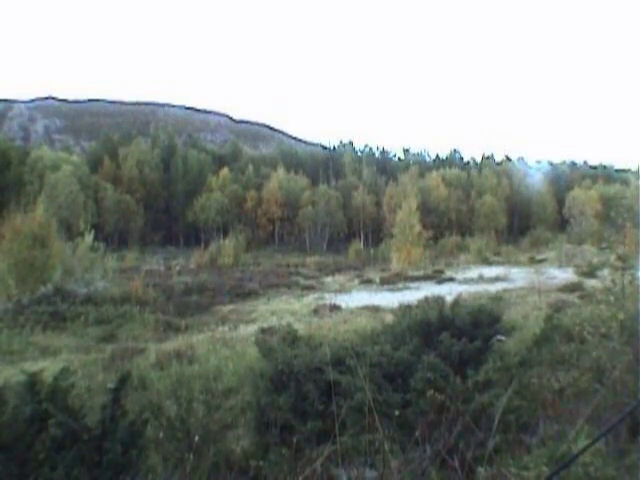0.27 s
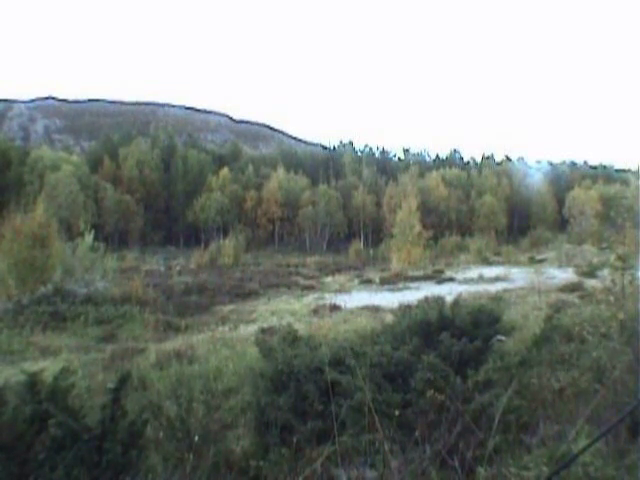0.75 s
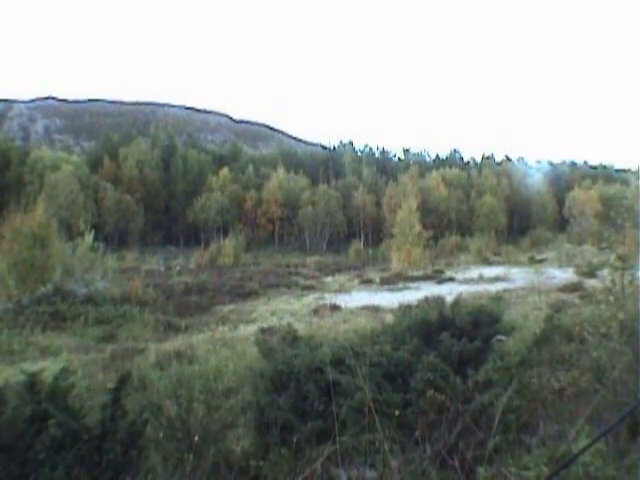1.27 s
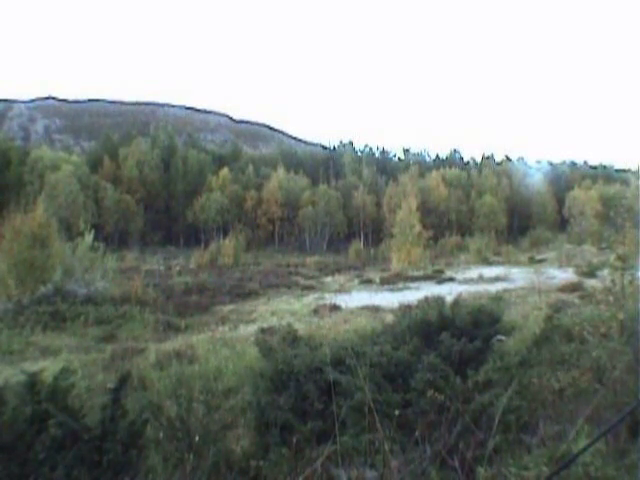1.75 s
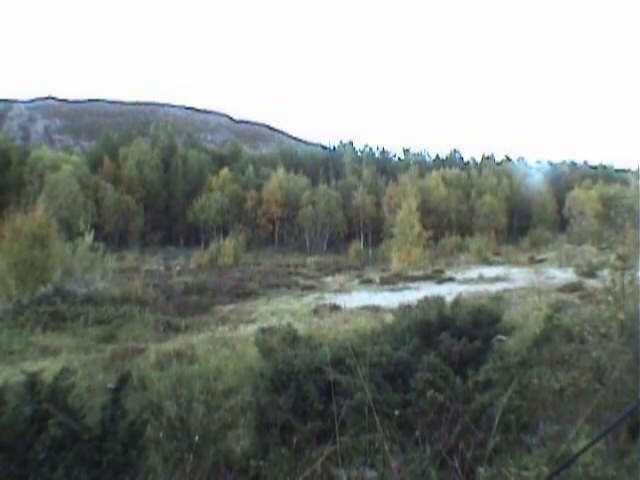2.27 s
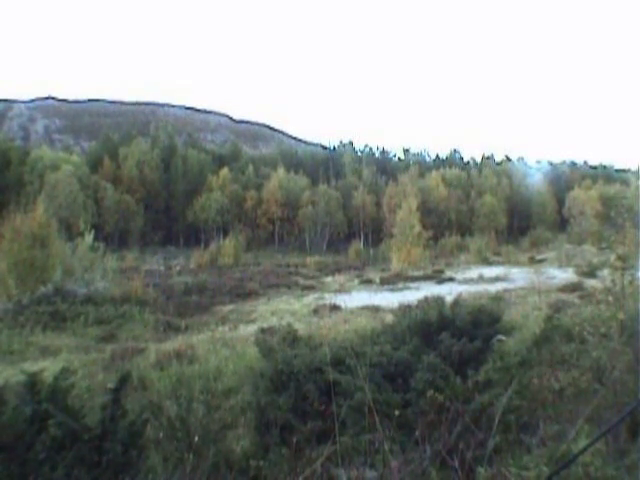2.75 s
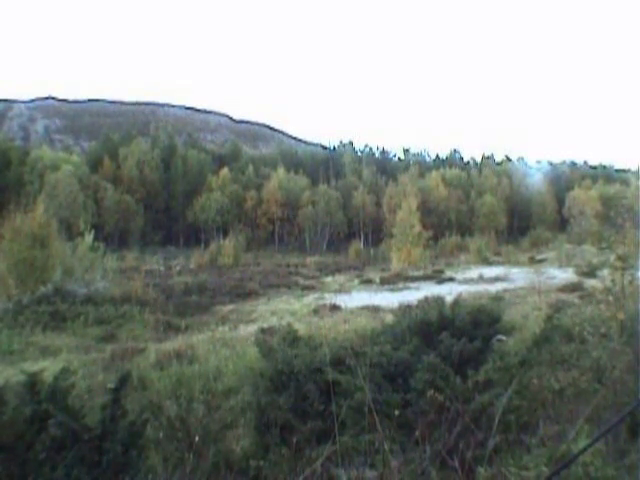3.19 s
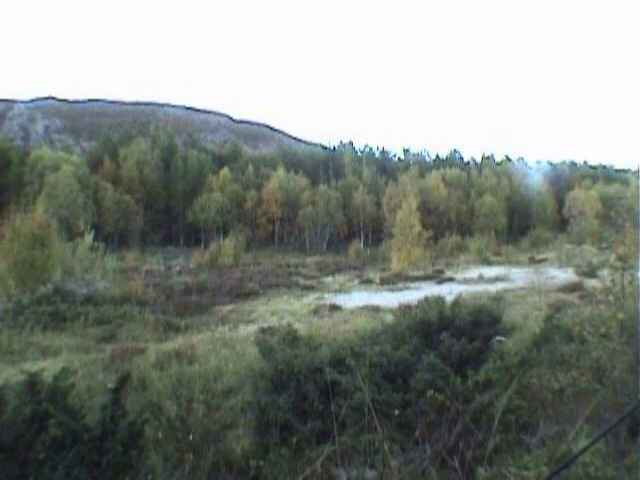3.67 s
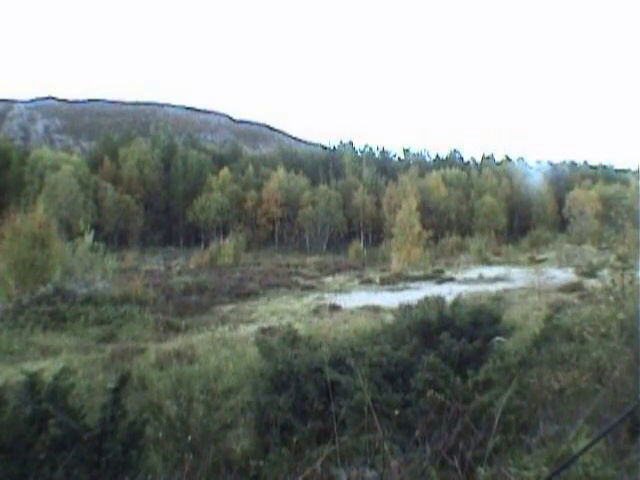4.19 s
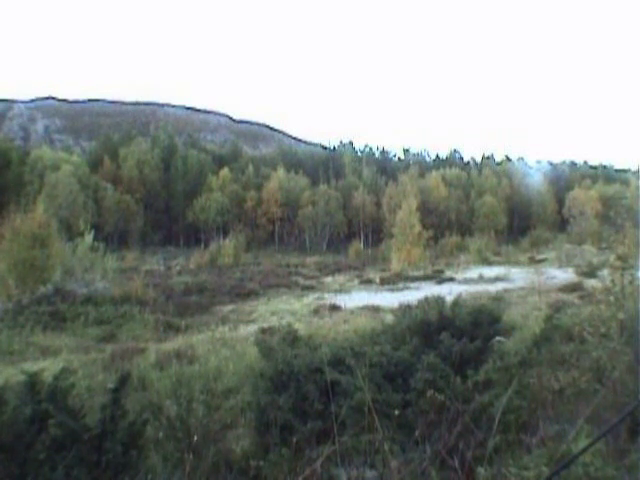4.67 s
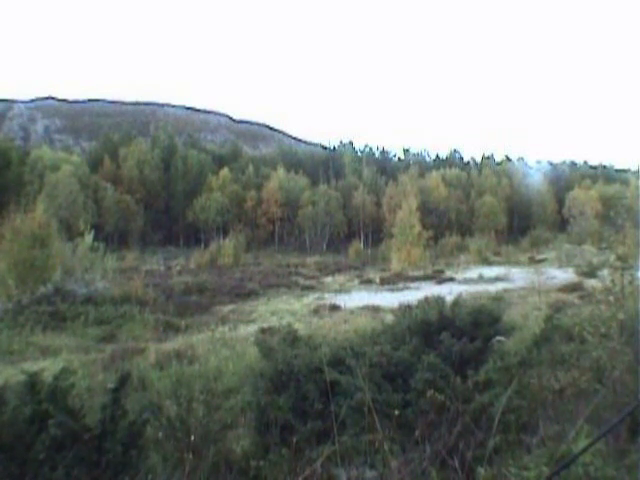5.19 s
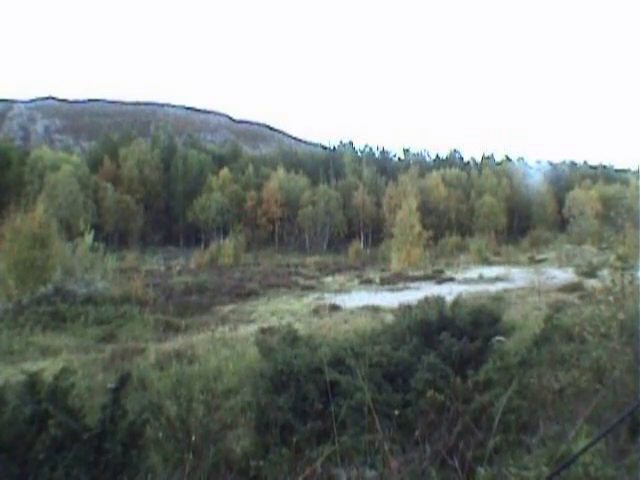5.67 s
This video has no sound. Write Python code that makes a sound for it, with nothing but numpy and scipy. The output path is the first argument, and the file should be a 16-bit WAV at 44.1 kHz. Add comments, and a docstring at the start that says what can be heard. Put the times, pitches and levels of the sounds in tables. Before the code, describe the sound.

A faint outdoor rush and a thin motor hum from the camera open the scene. A hunting dog yelps three times in quick succession, its clear, high voice ringing through the woodland. After the echo fades, two stronger, hoarser yelps follow, crackling slightly in the microphone. A soft handling bump and rustle come as the last echo dies away.

```python
"""A hound gives five high, yelping bays, three and then two, at the edge of an autumn wood.
Its vocal folds buzz through its throat: each bay arches up in pitch, rings clear and ends in a rasp.
The trees throw back a long tail. Under it lie a far rush of air and the hum of a camera's motor.
Loud notes crackle faintly, and near the end a hand nudges the camera."""
import sys
import numpy as np
from scipy import signal
from scipy.fft import rfft, irfft, next_fast_len
from scipy.io import wavfile
from scipy.ndimage import uniform_filter1d

SR = 44100
rng = np.random.default_rng(int(sys.argv[2]) if len(sys.argv) > 2 else 0)


def log_audio(samples):
    """Write samples as a 16-bit WAV file to the path given in sys.argv[1]."""
    # one column per channel
    frames = np.atleast_2d(samples).T
    # limit to full scale, then quantise
    limited = np.clip(frames, -1, 1)
    pcm = np.round(limited * 32767).astype(np.int16)
    wavfile.write(sys.argv[1], SR, pcm)


N = 261513
TIME = np.arange(N) / SR
# in the third bay the voice catches on a lower, fuller note, then breaks upward
CATCH_BAY, CATCH_HZ, BREAK_S, BREAK_HZ_PER_S = 2, 690.5, 2.425, 12000


def hound(ear_lag_s=.00002, hiss_db=-55.5, linger_db=-25):
    """All five bays: the stereo sound that comes straight to us, and the sound sent into the trees."""
    # one bay a row: (start [s], length [s], opening pitch [Hz], top pitch [Hz], sag of the top [Hz/s],
    # overshoot [Hz], fade-in [s], level at the swell [dB], swell after [s], swell size [dB],
    # base note's share at the swell [dB], mouth brightness [dB], extra brightness at first [dB],
    # treble from strain [dB], hoarseness [rad per harmonic], rasp [dB], left over right [dB],
    # level sent into the trees [dB])
    bays = [(1.608, 0.147, 770, 889, 149, 51.5, 0.016, -15.5, 0.083, 9.5, -11.5, 0.2, -16, -4.5, 0.04, -2.5, -2.5, -0.5),
            (2.032, 0.131, 679, 791.5, 785, 2, 0.0092, -18, 0.047, 5.5, -11, -4.5, -8.5, -6, 0.045, -7, -2.5, 0),
            (2.367, 0.142, 542.5, 811.2, -100, -1, .02, -20.7, 0.088, 3, -10, -1.5, 12, -2.0, 0.1, -4.5, -2.5, -0.9),
            (4.272, 0.149, 682.3, 893.6, -5, -1.5, 0.012, -13, 0.076, 13.5, -14.5, -3.1, 17.5, 4, 0.081, 0, -2.5, 0.9),
            (4.629, 0.135, 622.3, 863.8, -310, 2, 0.012, -17.5, 0.064, 11, -12, -5.5, 13.5, 7.5, 0.075, 0, -3.5, 3.5)]
    # rasp of swirling air in the throat: (frequency [Hz], relative level [dB])
    rasp_colour = [(250, -28.5), (450, -32.5), (650, -9.5), (1000, -22), (1500, 8.5), (2000, 6.5),
                   (2550, 10), (3000, -16.5), (3800, -9), (4800, -10.5), (6800, -21), (8000, -25)]
    jitter, shimmer = 0.063 * drift(300), 0.46 * drift(170)   # unsteadiness of pitch and of strength
    rasp = noise(lambda hz: from_db(at_hz(rasp_colour, hz)))
    hiss = band(centre_hz=3820, width_hz=990) + 0.29 * band(centre_hz=6500, width_hz=2200)
    # the caught note lingers under the high one and beats with it
    linger = np.sqrt(2) * from_db(linger_db) * bell(BREAK_S + 0.017, half_s=0.03)
    low_note = linger * np.sin(2 * np.pi * CATCH_HZ * TIME)
    straight, sent = 0, 0
    for k, (*row, pan_db, sent_db) in enumerate(bays):
        catches, end_s = k == CATCH_BAY, row[0] + row[1]
        voice = bay(row, catches, jitter, shimmer, rasp)
        # as the folds let go, the last air hisses past the dog's teeth
        voice = voice + from_db(hiss_db) * hiss * bell(end_s + 0.0095, half_s=0.0085)
        straight = straight + place(voice + catches * low_note, pan_db, ear_lag_s)
        sent = sent + voice * from_db(sent_db)
    return straight, sent


def bay(row, catches, jitter, shimmer, rasp, release_s=0.036, slack_db_per_hz=0.12):
    """One bay: the vocal folds chop the breath into a base note and its overtones (whole multiples)."""
    (start_s, length_s, opening_hz, top_hz, sag, overshoot_hz, attack_s, peak_db, peak_s, swell_db,
     peak_share_db, open_db, opening_db, strain_db, hoarse, rasp_db) = row
    end_s = start_s + length_s
    on = (TIME > start_s) & (TIME < end_s)
    t = TIME[on]
    since, left = t - start_s, end_s - t
    pitch = pitch_arch(since, length_s, opening_hz, top_hz, sag, overshoot_hz)
    swell = bell(start_s + peak_s, half_s=0.028)[on]
    push_db = swell_db * (swell - 1)
    # on the way down the base note passes the throat's lowest resonance and grows
    closing = bell(end_s - .02, half_s=0.0068)[on]
    flutter_db = 0.9 * (1 - swell) * wander(63, size=len(t), count=1)[0]
    level_db = peak_db + push_db + 2 * closing + flutter_db
    # the swell goes mostly into the overtones, so the base note's share shrinks
    share_db = peak_share_db - 0.65 * push_db + 4 * closing
    if catches:
        pitch = np.minimum(pitch, CATCH_HZ + BREAK_HZ_PER_S * np.maximum(t - BREAK_S, 0))
        caught = bell(BREAK_S - 0.0055, half_s=0.011)[on]
        level_db, share_db = level_db + 4.5 * caught, share_db + 8.5 * caught
    # the folds swing unevenly as they start and as they let go; the middle is clear
    rough = np.clip(.055 + 0.23 * np.exp(-since / .018) + 0.79 * np.exp(-(left / 0.021) ** 2), 0, 1)
    phase = 2 * np.pi * np.cumsum(pitch * (1 + rough * jitter[on])) / SR
    # each closing of the folds comes a little early or late
    fray = hoarse * drift(450)[on]
    bright_db = open_db + opening_db * np.exp(-(since / .024) ** 2)
    # strain and the swell lift the treble, more so late in the bay; slack folds dull it
    treble_db = strain_db + 0.22 * (push_db - np.median(push_db)) + 1.5 * (2 * since / length_s - 1)
    treble_db -= slack_db_per_hz * (top_hz - pitch)
    overtones = throat(pitch, phase, fray, bright_db, treble_db)
    share = from_db(np.minimum(share_db, -1.2))
    folds = share * np.sin(phase) + np.sqrt(1 - share ** 2) * overtones
    # air rushes through each time the folds open
    breath = from_db(rasp_db) * rough * rasp[on] * (1 + 0.45 * np.cos(phase))
    voice = folds * np.sqrt(2 - rough ** 2) * (1 + rough * shimmer[on]) + breath
    out = np.zeros(N)
    out[on] = voice * from_db(level_db) * np.minimum(since / attack_s, 1) * np.minimum(left / release_s, 1)
    return out


def pitch_arch(since, length_s, opening_hz, top_hz, sag, overshoot_hz,
               climb_hz_per_s=6330, drop_hz_per_s=9840, end_hz=449, rounding_hz=44.6):
    """A bay's pitch climbs, holds and drops: the lowest of three curves, with rounded corners."""
    climb = opening_hz + climb_hz_per_s * since
    overshoot = overshoot_hz * np.exp(-.5 * ((since - .032) / .011) ** 2)   # from a hard start
    top = top_hz - sag * (since - length_s / 2) + overshoot
    drop = end_hz + drop_hz_per_s * (length_s - since)
    return -rounding_hz * np.log(np.sum(np.exp(-np.array([climb, top, drop]) / rounding_hz), axis=0))


def throat(pitch, phase, fray, bright_db, treble_db,
           length_ratio=0.96, mouth_hz=2300, mouth_width_hz=650, strain_hz=3300):
    """Overtones glide through the throat's resonances, the pitches at which it rings most easily."""
    # throat and open mouth at a length ratio of 1: (frequency [Hz], relative level [dB])
    resonances = [(1000, 4.5), (1400, -5.5), (1780, 4), (2100, -12), (2420, -3), (2700, -20.5),
                  (3100, -33.5), (3550, -23.5), (4000, -36), (4330, -51), (4680, -41.5), (5250, -39),
                  (5600, -30.5), (6300, -36), (7200, -36.5), (8000, -72)]
    k = np.arange(2, 13)[:, None]
    hz = k * pitch
    # above the second harmonic, the mouth's opening shapes the level and each one flickers on its own
    mouth_db = bright_db * np.exp(-.5 * ((hz - mouth_hz) / mouth_width_hz) ** 2)
    flicker_db = 2.8 * wander(70, size=len(pitch), count=len(k))
    lift_db = treble_db * np.clip(hz / strain_hz, 0, 1) ** 4
    gains = from_db(at_hz(resonances, hz * length_ratio) + (k > 2) * (mouth_db + flicker_db) + lift_db)
    gains /= np.sqrt(np.sum(gains ** 2, axis=0))
    # uneven timing frays the highest overtones most
    return np.sum(gains * np.sin(k * phase + (k - 2) * fray), axis=0)


def woodland(x, build_s=0.011, likeness=0.7, pan_db=0.9, near_db=8.5, near_s=0.056, flutter_db=1.5):
    """Countless trunks scatter a tail that dies sooner in the treble; a few near ones echo singly."""
    # scatter from the trees: (frequency [Hz], level [dB], time to fade by 60 dB [s])
    trees = [(300, -9, 4.3), (630, -7.5, 1.96), (890, -10.5, 1.9), (1700, -13, 1.365), (2520, -18.5, 1.5),
             (3420, -19.5, .25), (7000, -13, 0.2)]
    # nearest trunks and ground: (delay [s], level [dB])
    echoes = [(.0125, -28), (.031, -23.5), (0.097, -28), (.135, -26), (.21, -37.5)]
    t = TIME[:2 * SR]
    edges_hz = np.geomspace(250, 8000, 11)
    white = rng.standard_normal((2, 2, len(t)))
    response = np.zeros((2, len(t)))   # how the wood answers a single click
    for k, (low, high) in enumerate(zip(edges_hz, edges_hz[1:])):
        mid, side = signal.sosfilt(butter(2, [low, high], "band"), white[k % 2])
        hz = np.sqrt(low * high)
        decay = from_db(-60 * t / at_hz(trees, hz, axis=2))
        decay *= (1 - np.exp(-t / build_s)) * from_db(near_db * np.exp(-t / near_s))
        decay *= from_db(at_hz(trees, hz)) / np.sqrt(2 * np.sum(decay ** 2))
        response += decay * (np.sqrt(1 + likeness) * mid + np.sqrt(1 - likeness) * side * [[1], [-1]])
    tail = signal.fftconvolve(x[None], response, axes=1)[:, :N]
    tail = tail * from_db([[pan_db / 2], [-pan_db / 2]]) * from_db(flutter_db * drift(35))
    dull = signal.sosfilt(butter(2, 3000), x)
    return tail + sum(from_db(db) * np.interp(TIME - delay, TIME, dull) for delay, db in echoes)


def mic_ports(x, treble_hz=2200, treble_db=3.5, top_hz=4500, top_lag_s=.000012):
    """The microphone's left opening favours the treble and gets the highest overtones a little late."""
    treble = signal.sosfiltfilt(butter(4, treble_hz, "high"), x)
    top = signal.sosfiltfilt(butter(4, top_hz, "high"), x)
    late_top = np.array([np.interp(TIME - top_lag_s, TIME, top[0]), top[1]])
    return x - top + late_top + treble * (from_db([[treble_db / 2], [-treble_db / 2]]) - 1)


def far_air(level_db=-53.0, waver_db=-1.0):
    """A far rush of air with the microphone's hiss, mostly different at the two ears."""
    # rush and hiss: (frequency [Hz], relative level [dB])
    colour = [(20, -12.5), (50, -4.5), (95, -8.5), (180, -4.5), (265, -7.5), (350, -2), (560, -3),
              (900, -5), (1550, -5.5), (2000, -11), (3200, -12.5), (3700, -17), (4800, -20.5), (7400, -23)]
    # how alike the two ears hear it: (frequency [Hz], likeness [-1 to 1])
    likeness = [(50, 0.5), (265, -0.17), (500, 0.27), (900, -0.33), (1280, 0.24), (1550, -0.77),
                (2200, -0.0089), (4500, -0.31), (6500, 0.71)]
    mid = noise(lambda hz: from_db(at_hz(colour, hz)) * np.sqrt(1 + at_hz(likeness, hz)))
    side = noise(lambda hz: from_db(at_hz(colour, hz)) * np.sqrt(1 - at_hz(likeness, hz)))
    return from_db(level_db + waver_db * drift(9.9)) * np.array([mid + side, mid - side]) / np.sqrt(2)


def camera_motor(drum_hz=101.2, wobble=0.000586, flutter=0.14, uneven_db=4.5, apart_turns=0.56):
    """The motor hums on steady tones; its spinning drum adds a row of faint, uneven overtones."""
    # motor tones: (frequency [Hz], level [dB], shift between left and right [turns])
    hum = [(220.4, -64.5, 0.01), (451, -76, 0.05), (576, -67.5, .05), (604, -72.5, .08), (1260, -69, .22),
           (1660, -68, 0.61), (1731, -81.5, 1), (2076, -76, .25), (2360, -76, .25), (2660, -75.5, 0.45),
           (2800, -75, .25), (3074, -74.5, .2), (3300, -73.5, .27), (4080, -79, .1)]
    # outline of the drum's overtones: (frequency [Hz], typical level of each [dB])
    outline = [(1500, -75), (3200, -93.5), (4500, -100), (5600, -89), (6300, -82.5), (7400, -96.5)]
    wobbly_time = TIME + wobble * np.cumsum(drift(6.03)) / SR
    whirr = [(hz, at_hz(outline, hz) + uneven_db * min(rng.normal(), 1), apart_turns * rng.normal())
             for hz in drum_hz * np.arange(15, 75)]
    out = np.zeros((2, N))
    for hz, db, shift in list(hum) + whirr:
        wave = np.sqrt(2) * from_db(db) * np.sin(2 * np.pi * (hz * wobbly_time + rng.random()))
        out += [wave, np.roll(wave, round(shift * SR / hz))]
    return out * (1 + flutter * drift(5))


def hand_on_camera(right_lead_s=0.0012):
    """Nudges rock the camera, pushing its two microphones opposite ways; something rustles softly."""
    # nudges of the hand: (time [s], level [dB], half length [s], frequency [Hz])
    nudges = [(5.208, -34, 0.007, 50), (5.286, -33.5, 0.0047, 55.7), (5.358, -44, 0.006, 53)]
    # soft rustles: (time [s], level [dB], half length [s], centre [Hz], width [Hz])
    rustles = [(3.445, -57, 0.005, 2160, 1240), (5.11, -61, 0.12, 3240, 2990),
               (5.262, -58, 0.0048, 4670, 592.7), (5.28, -66, 0.052, 4770, 3000),
               (5.59, -68.5, 0.091, 3580, 3500)]
    rock = sum(from_db(db) * bell(s, half_s) * np.sin(2 * np.pi * hz * (TIME - s))
               for s, db, half_s, hz in nudges)
    rustle = sum(from_db(db) * bell(s, half_s) * band(hz, width) for s, db, half_s, hz, width in rustles)
    return np.array([rock, -np.interp(TIME + right_lead_s, TIME, rock)]) + rustle


def low_drone(s=1.2, half_s=.33, hz=108, level_db=-70.0):
    """A faint low drone swells and sinks before the first bay."""
    return np.sqrt(2) * from_db(level_db) * bell(s, half_s) * np.sin(2 * np.pi * hz * TIME)


def ticks(x, boost_db=26.5, small_per_s=50, small_db=-37, spread_db=4.0, pop_s=4.6825, pop_db=-14.5):
    """Tiny sharp ticks, denser and stronger the louder the sound, and one fuller pop in the last bay."""
    # one set tick in each bay: (time [s], level before the boost [dB])
    set_ticks = [(1.702, -50.5), (2.089, -56), (2.4347, -52), (4.3338, -50), (4.681, -37)]
    loud = np.sqrt(uniform_filter1d(np.mean(x ** 2, axis=0), size=400) + 1e-12)
    loud = loud / loud.max()
    strength = loud ** 0.29
    happens = (rng.random(N) < small_per_s * strength / SR) & (loud > .2)
    clicks = happens * strength * from_db(small_db + spread_db * rng.standard_normal(N))
    for s, db in set_ticks:
        clicks[round(s * SR)] = from_db(db + boost_db)
    clicks = signal.sosfilt(butter(1, 9000), clicks + 1e-18)
    pop = signal.sosfilt(butter(1, [250, 4200], "band"), bell(pop_s, half_s=.00006) + 1e-18)
    return clicks + from_db(pop_db) * pop


def fizz(x, level_db=-33.0, flicker_db=8.5):
    """A faint flickering fizz that grows with the sound's power, so only loud notes carry it."""
    power = uniform_filter1d(np.mean(x ** 2, axis=0), size=400)
    grain = rng.standard_normal(N) + 0.43 * rng.standard_normal((2, N))
    return from_db(level_db + flicker_db * drift(70)) * power * grain


def from_db(db):
    """Turn decibels into a number to multiply by."""
    return 10 ** (np.asarray(db) / 20)


def rms_one(x):
    """Scale to an average strength (rms) of 1."""
    return x / np.sqrt(np.mean(x ** 2) + 1e-20)


def at_hz(points, hz, axis=1):
    """Read one column of a table at any frequency, gliding between its rows."""
    points = np.array(points)
    return np.interp(np.log(np.maximum(hz, 1)), np.log(points[:, 0]), points[:, axis])


def butter(order, hz, kind="low"):
    """A smooth filter that keeps the lows, the highs or a band."""
    return signal.butter(order, hz, kind, fs=SR, output="sos")


def noise(gain_at):
    """Noise of strength 1, coloured by a gain for each frequency."""
    size = next_fast_len(N)
    hz = np.arange(size // 2 + 1) * SR / size
    return rms_one(irfft(rfft(rng.standard_normal(size)) * gain_at(hz), size)[:N])


def band(centre_hz, width_hz):
    """Noise of strength 1 gathered around one frequency."""
    return noise(lambda hz: 1 / (1 + (2 * (hz - centre_hz) / width_hz) ** 2))


def drift(rate):
    """A random wander of spread 1, up to about this many turns a second."""
    return noise(lambda hz: 1 / (1 + (hz / rate) ** 2))


def wander(rate, size, count):
    """Several short, unrelated drifts."""
    hz = np.arange(SR // 4 + 1) * 2
    spectra = rfft(rng.standard_normal((count, SR // 2))) / (1 + (hz / rate) ** 2)
    return rms_one(irfft(spectra, SR // 2))[:, :size]


def bell(s, half_s):
    """A bell-shaped rise and fall around one moment."""
    return np.exp(-.5 * ((TIME - s) / half_s) ** 2)


def place(x, pan_db, lag_s):
    """Mono to stereo, with the left side a little late."""
    return np.array([np.interp(TIME - lag_s, TIME, x) * from_db(pan_db / 2), x * from_db(-pan_db / 2)])


def scene():
    """The hound and its echo over the quiet background."""
    straight, sent = hound()
    bays_in_wood = mic_ports(straight) + woodland(sent)
    return bays_in_wood + far_air() + camera_motor() + low_drone() + hand_on_camera()


def record(dry):
    """The high treble is cut off, and faint ticks and fizz ride on the loud notes."""
    mic_top_hz, cutoff_hz = 7634, 16000
    narrow = signal.sosfilt(signal.ellip(8, .3, 48, mic_top_hz, fs=SR, output="sos"), dry)
    crackly = narrow + ticks(narrow) + fizz(narrow)
    return signal.sosfilt(signal.ellip(10, .2, 80, cutoff_hz, fs=SR, output="sos"), crackly)


dry = scene()
out = record(dry)
log_audio(out)
```